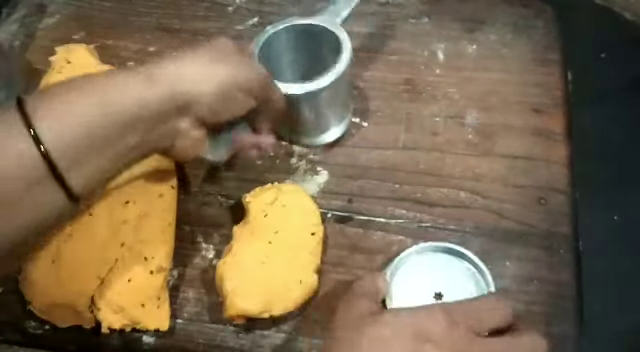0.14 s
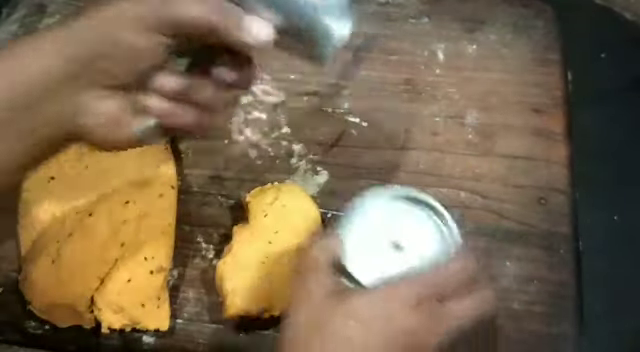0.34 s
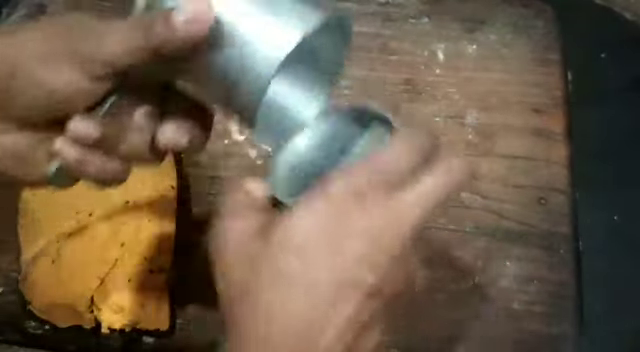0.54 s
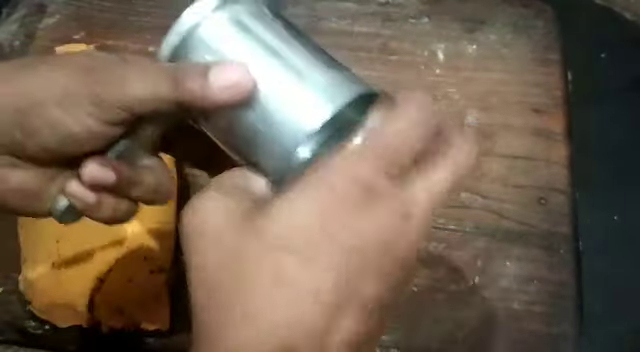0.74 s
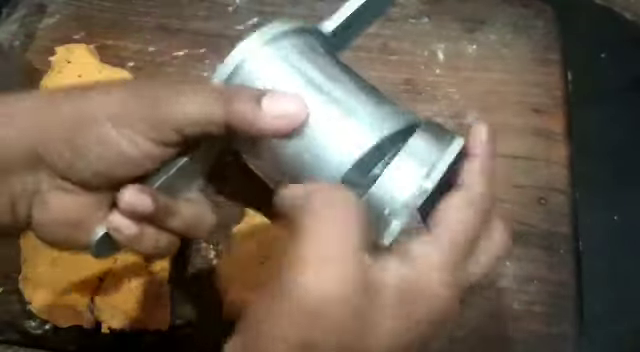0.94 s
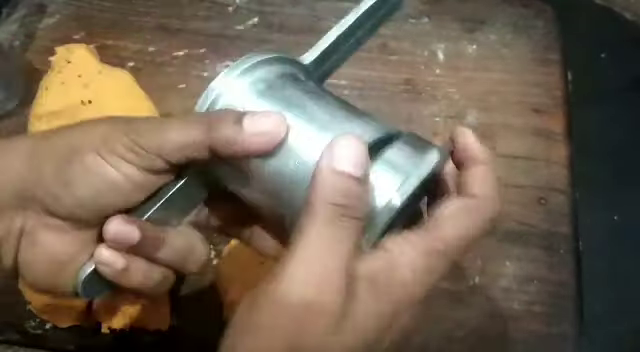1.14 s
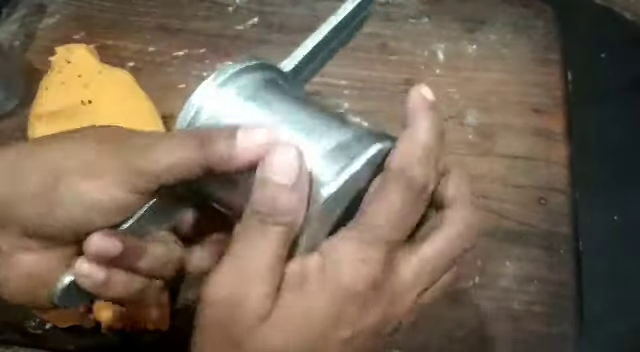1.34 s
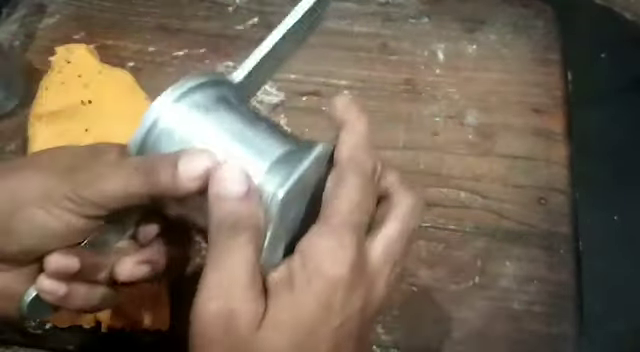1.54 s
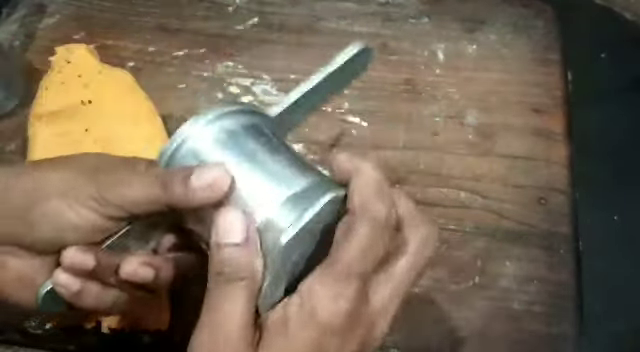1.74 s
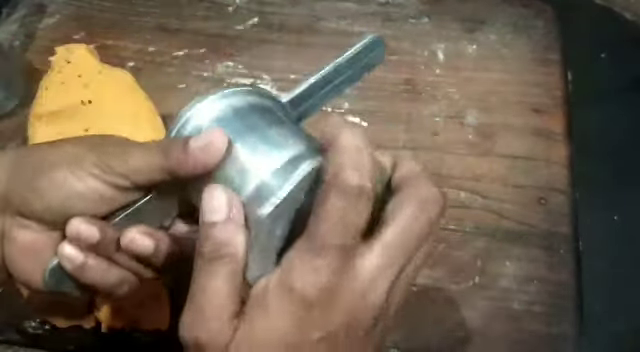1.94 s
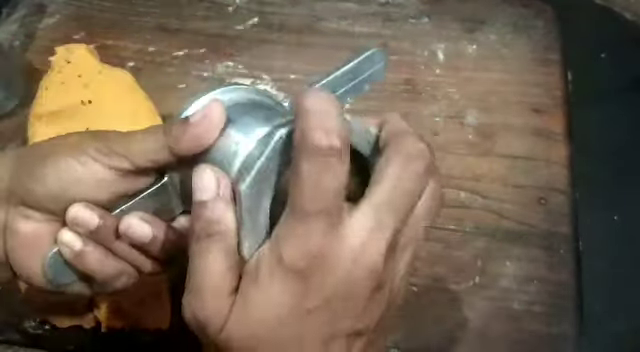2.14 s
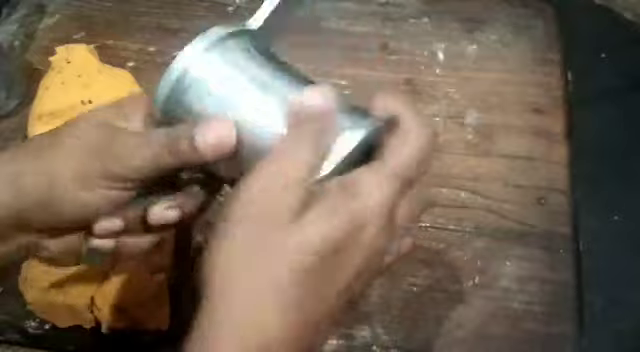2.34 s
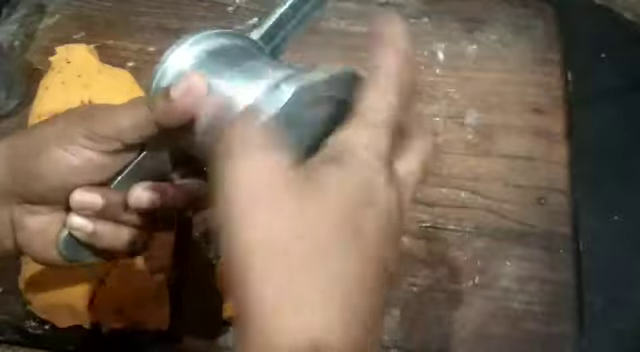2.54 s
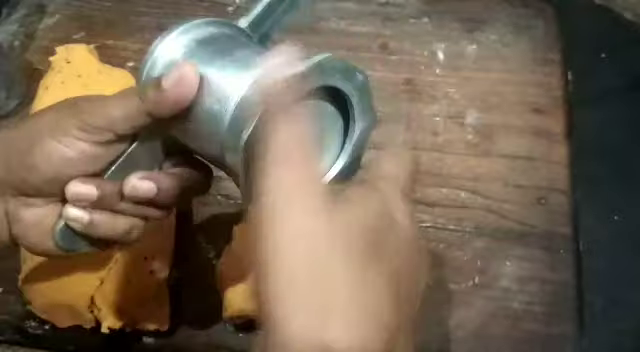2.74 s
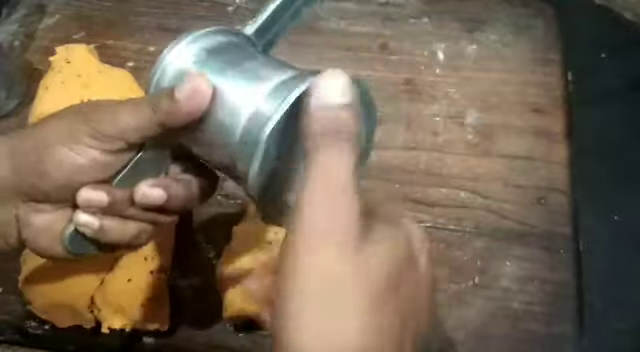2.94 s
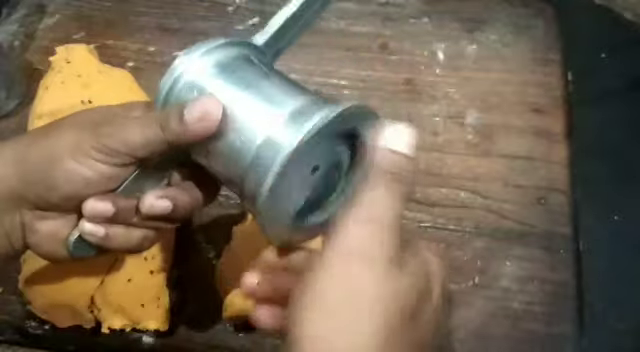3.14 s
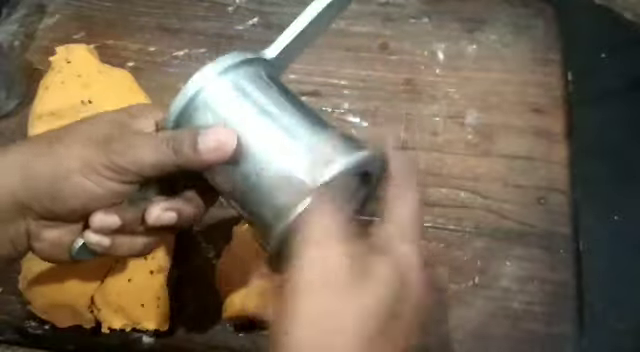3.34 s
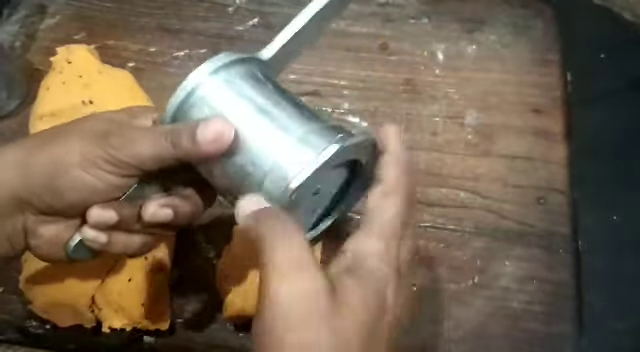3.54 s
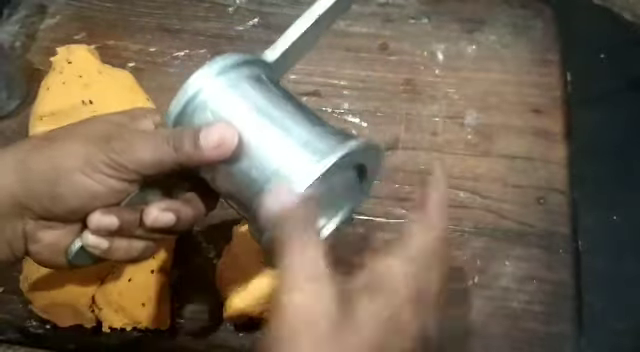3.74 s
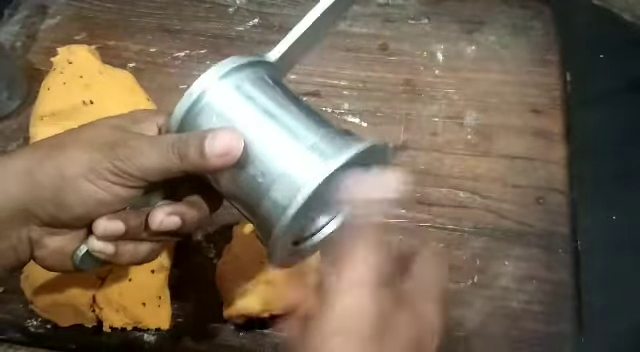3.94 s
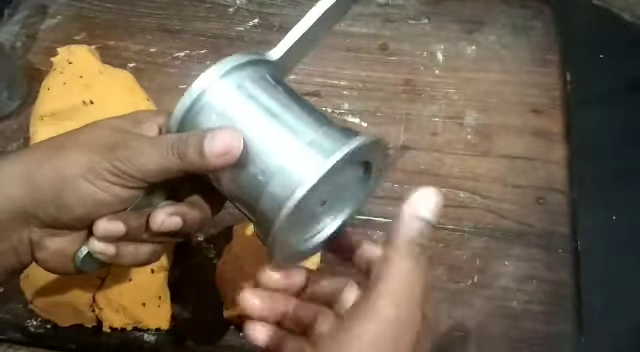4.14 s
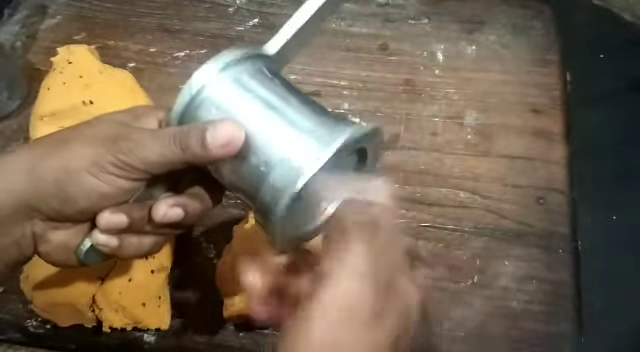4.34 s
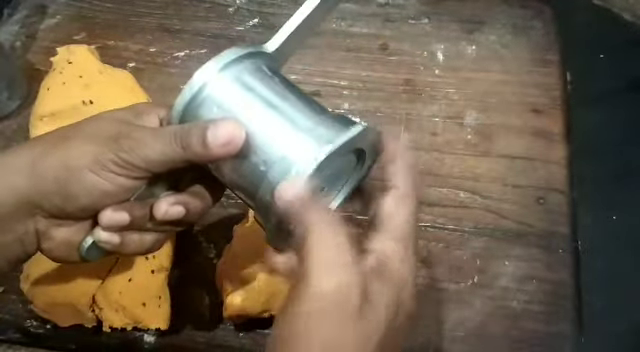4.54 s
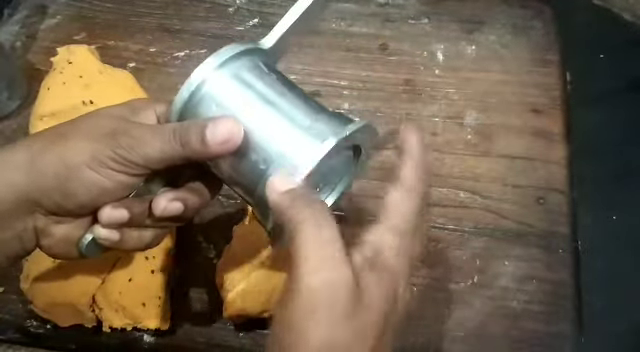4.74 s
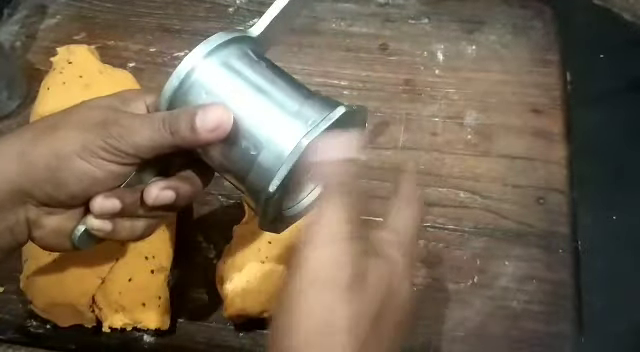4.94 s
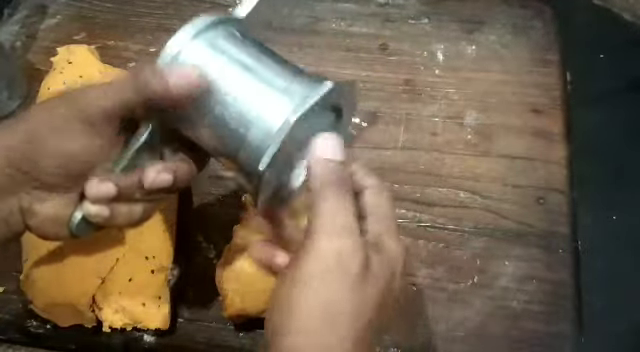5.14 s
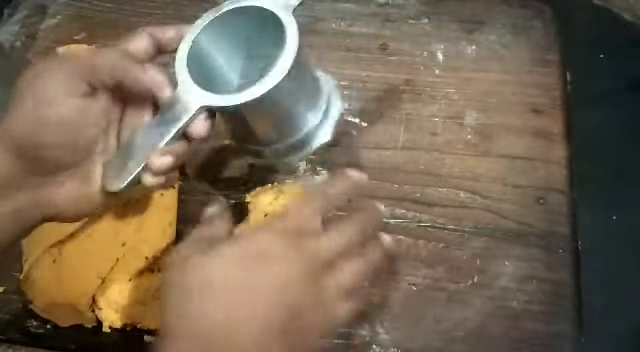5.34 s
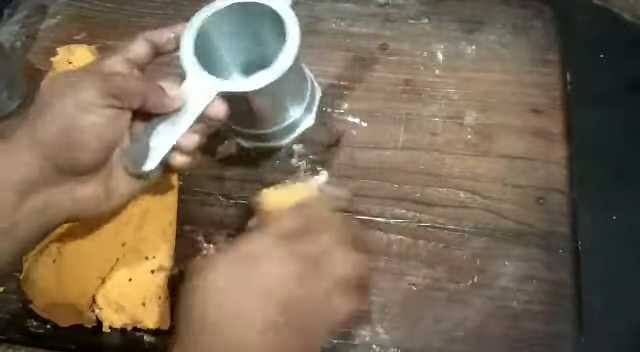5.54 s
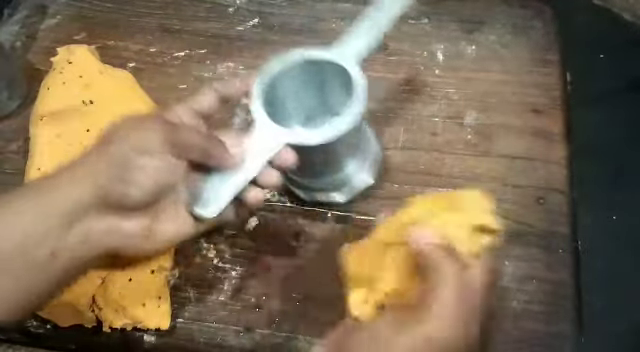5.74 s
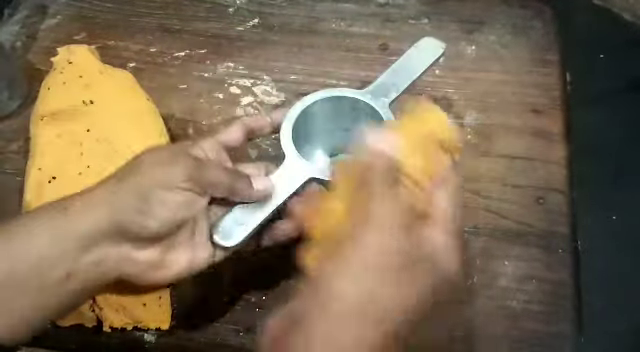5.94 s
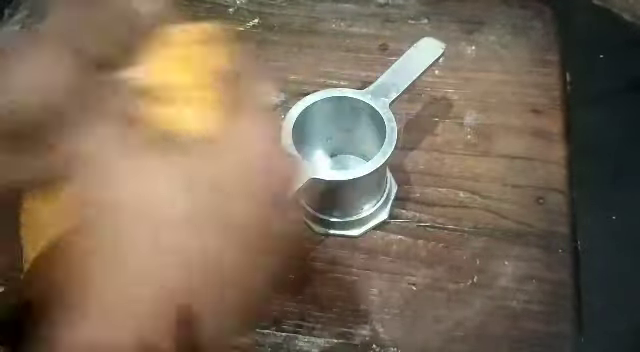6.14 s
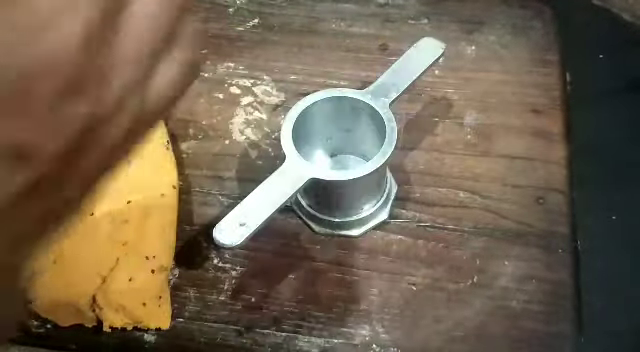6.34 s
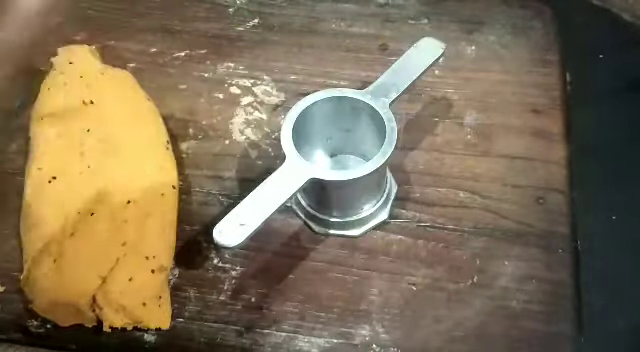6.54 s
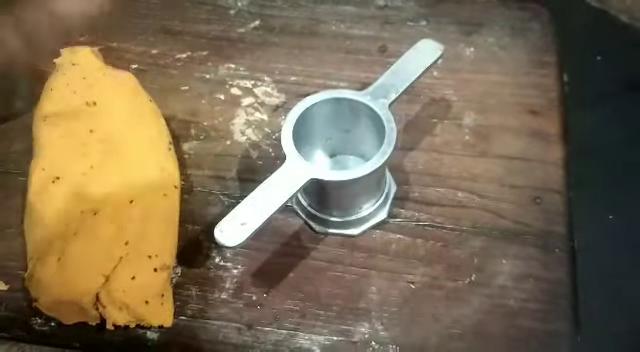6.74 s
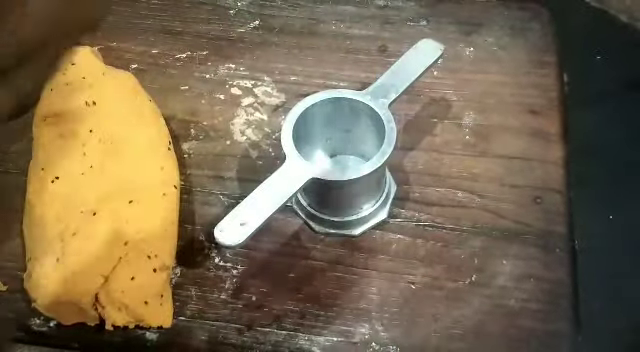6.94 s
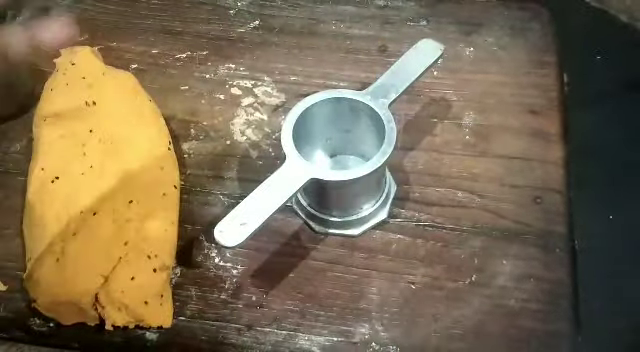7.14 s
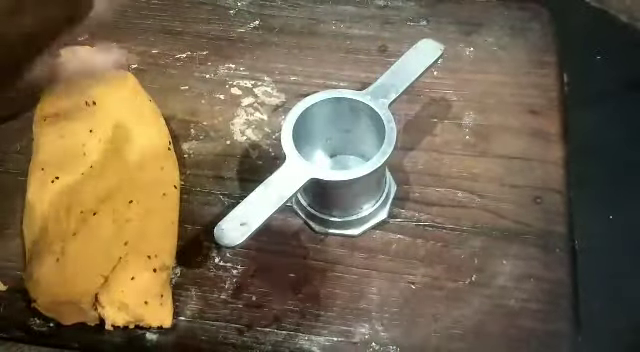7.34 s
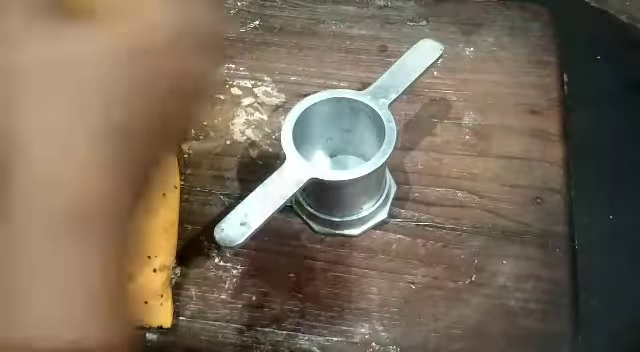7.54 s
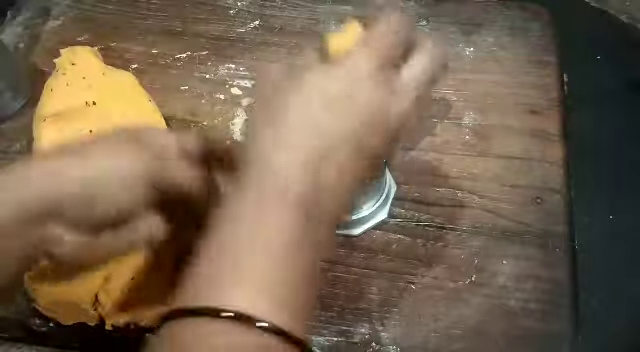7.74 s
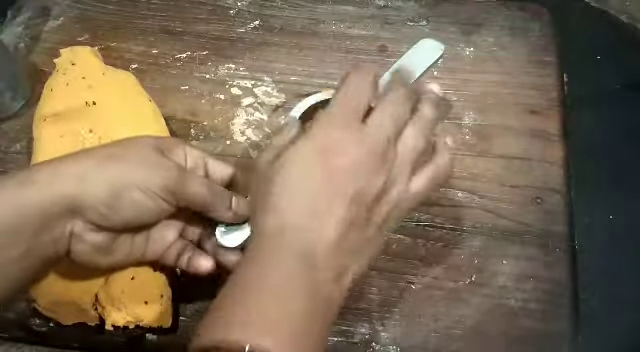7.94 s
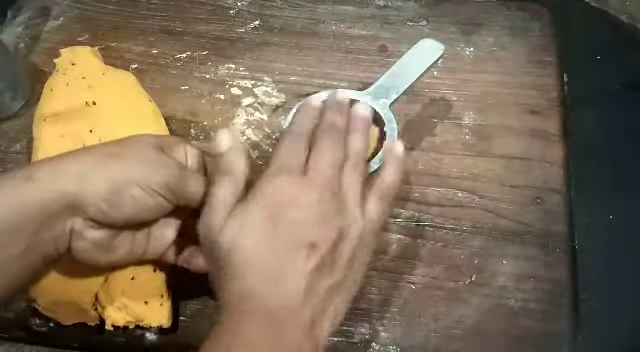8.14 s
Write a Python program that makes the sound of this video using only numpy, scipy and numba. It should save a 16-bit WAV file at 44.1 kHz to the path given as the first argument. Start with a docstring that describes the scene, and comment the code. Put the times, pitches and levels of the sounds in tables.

```python
"""Soft knocks and scuffs on wood, metal clinks and scrapes, then heavier thuds on the board and rubbing palms.
A cast-metal press is fitted together by hand in a small hard-walled kitchen: its threaded cap, holding a loose
disc, is knocked onto the barrel and screwed home. Contact forces drive noise bands, barrel and disc modes and
the air inside the barrel. Pushes ring the board's modes; palms roll dough with coloured, swelling noise.
Room noise, a noise-tail reverb and a two-microphone phone complete the scene."""
import sys
import numpy as np
from scipy import signal
from scipy.fft import rfft, irfft
from scipy.io import wavfile
from scipy.ndimage import uniform_filter1d
from numba import njit

SR = 44100
rng = np.random.default_rng(int(sys.argv[2]) if len(sys.argv) > 2 else 0)


def master_out(mix):
    """Clip the mix to full scale and print it as 16-bit PCM to the path in sys.argv[1]."""
    frames = np.transpose(np.atleast_2d(mix))
    ceiling = np.clip(frames, -1, 1)
    pcm = np.round(ceiling * 32767).astype(np.int16)
    wavfile.write(sys.argv[1], SR, pcm)


N = 361575
T = np.arange(N) / SR

# modes of the loose disc: (f/Hz, width/Hz, relative level/dB)
DISC_MODES = [(2420, 50, -13), (6070, 45, -11), (9185, 35, 0), (10090, 50, -8), (12730, 60, -6),
              (14360, 45, -10)]


def undb(db):
    """Turn decibels into an amplitude factor."""
    return 10 ** (np.asarray(db) / 20)


def unit(x):
    """Scale to an rms of 1."""
    return x / np.sqrt(np.mean(x ** 2))


def colour(x, table, size=512):
    """Causal filter through (f/Hz, level/dB) points, from the cepstrum of the log gain; noise keeps its power."""
    hz, db = np.transpose(table)
    bins = np.linspace(1, SR / 2, size + 1)
    gain = undb(np.interp(np.log(bins), np.log(hz), db))
    # fold the cepstrum forward in time: minimum phase
    ceps = irfft(np.log(gain))
    ceps[1:size] *= 2
    ceps[size + 1:] = 0
    taps = irfft(np.exp(rfft(ceps)))
    taps = np.reshape(taps / np.linalg.norm(taps), (1,) * (x.ndim - 1) + (-1,))
    return signal.oaconvolve(x, taps, axes=-1)[..., :N]


def ring(x, hz, width):
    """One mode, deaf to the lowest and highest pitches; an impulse starts it at about amplitude 1."""
    radius = np.exp(-np.pi * width / SR)
    turn = 2 * np.pi * hz / SR
    return signal.lfilter([.5, 0, -.5], [1, -2 * radius * np.cos(turn), radius * radius], x)


def noisy(x, hz, width):
    """A mode scaled so that steady noise of power 1 rings at about power 1."""
    return np.sqrt(4 * np.pi * width / SR) * ring(x, hz, width)


@njit
def svf(x, hz, width):
    """State-variable band-pass with a moving centre, gain 1 there."""
    y, band, low = np.empty(len(x)), 0., 0.
    for i in range(len(x)):
        g = np.tan(np.pi * hz[i] / SR)
        k = width / hz[i]
        v = (band + g * (x[i] - low)) / (1 + g * (g + k))
        band = 2 * v - band
        low = low + 2 * g * v
        y[i] = k * v
    return y


def walk(rate):
    """A slow random curve: levels held for 1 / rate s, then smoothed twice."""
    t = T[::16]
    hold = int(SR / 16 / rate)
    held = np.repeat(rng.standard_normal(len(t) // hold + 1), hold)
    smooth = uniform_filter1d(uniform_filter1d(held, hold), hold)
    return np.interp(T, t, smooth[:len(t)])


def spikes(s, size):
    """Impulses of the given sizes at the given times."""
    x = np.zeros(N)
    np.add.at(x, (np.asarray(s) * SR).astype(int), size)
    return x


def burst(x, tau_s):
    """Each impulse opens a short fading spray of noise."""
    fade = signal.lfilter([1], [1, -np.exp(-1 / (tau_s * SR))], x)
    return fade * rng.standard_normal(N)


def strokes(table):
    """Gain of strokes that swell and fade evenly in dB, then any further column averaged by stroke strength."""
    s, db, swell_s, fade_s, *share_db = np.transpose(table)[..., None]
    t = T[::32]
    distance = np.where(t < s, (s - t) / swell_s, (t - s) / fade_s)
    each = undb(db - 20 * distance)
    total = each.sum(axis=0) + 1e-30
    curves = [total] + [(each * share).sum(axis=0) / total for share in share_db]
    return [np.interp(T, t, curve) for curve in curves]


def air():
    """Steady room rumble and microphone hiss; part of the bass is shared by both sides and wavers."""
    # spectrum of the noise: (f/Hz, relative level per Hz/dB)
    spectrum = [(18, -70), (30, -30), (98, -32), (199, -3), (554, -9), (600, -12.5), (889, -12),
                (1460, -20), (2750, -16.5), (3980, -20), (4420, -15.5), (8080, -19.5), (13700, -14),
                (16000, -28)]
    own = rng.standard_normal((2, N))
    shared = signal.lfilter([.07], [1, -.93], 1.52 * rng.standard_normal(N)) * undb(0.25 * walk(15.0))
    side_db = -54.5 + np.array([[-.8], [.8]])
    return undb(side_db) * unit(colour(own + shared, spectrum, size=2048))


def kitchen(x):
    """Hard-walled reverb: fading noise for each side, more alike in the bass, the treble dying first."""
    # bands of the tail: (f/Hz, t60/s, relative level/dB)
    room = [(292, 0.52, -15), (800, 0.43, -2.5), (2970, 0.31, 1), (5430, 0.22, 3.5), (12700, 0.19, 3)]
    t = T[:SR]
    tail = 0
    for hz, t60, db in room:
        edges = [hz / 1.8, min(hz * 1.7, .45 * SR)]
        sos = signal.butter(2, edges, "band", fs=SR, output="sos")
        noise = rng.standard_normal((2, SR)) + 655.0 / hz * rng.standard_normal(SR)
        tail = tail + undb(db - 60 * t / t60) * signal.sosfilt(sos, noise)
    tail = tail * np.clip((t - .002) / 0.00018, 0, 1)  # the first walls answer after 2 ms
    return signal.fftconvolve(x, tail / np.linalg.norm(tail[0]), axes=1)[:, :N]


def squeak():
    """A faint thin tone as the press is lowered: a narrow band of noise that swells and fades."""
    start_s, length_s = 5.31, .16
    swell = np.sin(np.pi * np.clip((T - start_s) / length_s, 0, 1))
    return undb(-56) * swell * noisy(rng.standard_normal(N), 4400, 115.0)


def hands():
    """Dry skin on skin and dough: hiss in fine uneven grains, and small ticks as sticky dough lets go."""
    # palm strokes: (t of the loudest moment/s, level/dB, swell by 20 dB/s, fade by 20 dB/s)
    palms = [(5.1, -56.5, 0.088, 0.22), (5.38, -55.5, 0.2, 0.085), (5.61, -46, 0.2, 0.058),
             (5.8, -58.5, 0.64, 0.95), (6.28, -52.5, 0.11, 0.056), (6.5, -50, 0.11, 0.1),
             (6.58, -47.5, 0.031, 0.13), (6.735, -42, 0.025, 0.083), (6.89, -47, 0.047, 0.16),
             (7.1, -49, 0.085, 0.11), (7.32, -55.5, 0.19, 0.049), (7.43, -49, .055, 0.027),
             (7.52, -55.5, 0.069, 0.94), (7.86, -59, 0.03, 0.29)]
    # spectrum of the skin hiss: (f/Hz, relative level per Hz/dB)
    skin = [(350, -11), (600, 7), (834, -2.5), (1130, -2.5), (2120, -1.5), (4220, -5.5), (12300, 2.5),
            (16000, -5)]
    # dough ticks: (t/s, relative level/dB, f/Hz)
    dough = [(5.213, -45.5, 2700), (6.3145, -50, 8300), (7.419, -53, 4220)]
    grains = rng.standard_normal((2, N)) * undb(2.0 * rng.exponential(size=N))
    ticks = 0
    for s, db, hz in dough:
        spray = burst(spikes([s], undb(db - 1.5)), 0.002)
        ticks = ticks + ring(spray, hz, hz * 0.16)
    return colour(unit(grains), skin) * strokes(palms)[0] + ticks


def board():
    """A push rings the wood's modes, duller the longer it lasts; a short noise spray is the hard edge."""
    # knocks on the board, soft ones first: (t/s, relative level/dB, edge over the thud before trim/dB, push/ms)
    thuds = [(.002, -32, -34, 1.8), (0.023, -35, -22, 0.39), (0.05, -44, -25, 0.72), (0.1, -30, -26, 0.38),
             (0.19, -37, -26, 0.3), (5.935, -12, -37, 1.4), (5.938, -1.5, -30.5, 0.57),
             (6.28, -32, -11, 0.28), (7.897, -11, -38, 0.99), (7.954, -27, -19.5, 0.17)]
    # the barrel's foot scuffs the board: (t of the loudest moment/s, relative level/dB,
    # swell by 20 dB/s, fade by 20 dB/s)
    drag = [(0.0, -60.5, 0.0062, 0.13), (.1, -69.5, 0.028, 0.032), (0.2, -70.5, 0.046, 0.0035)]
    # modes of the board: (f/Hz, relative level/dB, t60/s)
    wood_modes = [(200, -12, 0.029), (349.4, 5, 0.041), (406, 3.5, 0.034), (539, -1, 0.05),
                  (772, -4, 0.043), (890, -1, 0.02), (1087, 0, 0.016), (1320, -3, 0.021), (1690, -1, 0.012),
                  (2530, -0.5, 0.0094)]
    s, db, edge_db, push_ms = np.transpose(thuds)
    push = strokes(drag)[0] * undb(6.1 * walk(60.)) * rng.standard_normal(N)
    for start, gain, ms in zip(s, undb(db - 9.5), push_ms):
        pulse = np.hanning(int(ms * SR / 1000) + 3)
        push[int(start * SR):][:len(pulse)] += gain * pulse / pulse.sum()
    wood = 0
    for k, (hz, mode_db, t60) in enumerate(wood_modes):
        width = np.log(1000) / (np.pi * t60)
        wood = wood + (-1) ** k * undb(mode_db) * ring(push, hz, width)
    edge = burst(spikes(s, undb(db + edge_db + 13.0)), 0.0034)
    for _ in range(2):
        edge = svf(edge, np.full(N, 2700.), 2850.0)
    return (wood + edge) * undb([[-1.2], [1.2]])


def chatter(start_s, length_ms):
    """Contact force of one blow: (first sample, a swell that rises fast and fades with its contact time)."""
    t = np.arange(int(length_ms * SR / 150)) / (length_ms * SR / 1000)  # in contact times
    swell = (1 - np.exp(-t / 0.46)) * np.exp(-t)
    return int(start_s * SR), swell / swell.max()


def forces(contacts, db):
    """All blows laid out in time at the given levels."""
    x = np.zeros(N)
    for (i, swell), gain in zip(contacts, undb(db)):
        x[i:i + len(swell)] += gain * swell
    return x


def catches(per_s, tau_s, spread_db):
    """Sliding metal catches at random: sudden jumps of force that fade within milliseconds; rms 1."""
    jumps = (rng.random(N) < per_s / SR) * undb(spread_db * rng.uniform(-1.06, 1, N))
    return unit(0.66 + signal.lfilter([1], [1, -np.exp(-1 / (tau_s * SR))], jumps))


def grit(force, patchiness):
    """Countless small modes blur into a row of bands, each flickering on its own."""
    # toneless part of scrape and blow: (f/Hz, relative level per Hz/dB)
    spectrum = [(300, -16.5), (500, -7.5), (900, -2.5), (2200, 9), (2900, 7), (3700, 8.5), (5300, 6),
                (7000, 7), (7600, 6.5), (10500, 2), (11600, -15), (12600, -1.5), (14000, -3), (15500, -10)]
    hz, db = np.transpose(spectrum)
    centres = 15500 * np.linspace(.15, 1, 28) ** 2
    widths = 1.71 * np.gradient(centres)
    gains = undb(np.interp(np.log(centres), np.log(hz), db)) * np.sqrt(widths)
    out = 0
    for centre, width, gain in zip(centres, widths, gains):
        once = noisy(force, centre, width)
        twice = noisy(once, centre, width) * np.sqrt(2 * np.pi * width / SR)
        out = out + gain * undb(patchiness * walk(18)) * twice
    return out / np.linalg.norm(gains)


def body(modes, force, patchiness, wander, turn):
    """Grip and contact point wander: each mode comes and goes, shifts in pitch and swings between the sides."""
    out = np.zeros((2, N))
    for k, (hz, width, db) in enumerate(modes):
        uneven = force * undb(patchiness * walk(18))
        mode = svf(uneven, hz * (1 + wander * walk(9)), width)
        mode = mode * np.sqrt(SR / (np.pi * width))  # narrow modes ring as loud as wide ones
        angle = (-1) ** k * np.pi / 4 + turn * walk(12)
        out += undb(db) * np.sqrt(2) * mode * np.array([np.cos(angle), np.sin(angle)])
    return out / np.linalg.norm(undb(np.transpose(modes)[2]))


def knocks(s, hz, db):
    """Each blow sets the air in the barrel ringing at its own pitch."""
    width_hz, rise_s = 46, 0.00023
    t = T[:SR // 20]
    fade = (1 - np.exp(-t / rise_s)) * np.exp(-np.pi * width_hz * t)
    x = np.zeros(N)
    for start, pitch, gain in zip(s, hz, undb(db)):
        x[int(start * SR):][:len(t)] += gain * fade * np.sin(2 * np.pi * pitch * t)
    return x


def scraped_air(force):
    """The scrape excites the air inside the barrel, a resonance that moves as cap and palm close it."""
    # pitch of the air in the barrel, lower the more it is closed: (t/s, f/Hz)
    pitch = [(.62, 1540), (1.058, 1310), (1.45, 1630), (1.97, 1450), (2.2, 1130), (2.26, 1270),
             (2.399, 1280), (2.45, 1070), (2.7, 1050), (2.8, 1250), (3.0, 1460), (3.09, 1180), (3.19, 1470),
             (3.36, 1380), (3.41, 1040), (3.57, 1160), (3.66, 1450), (3.83, 940), (3.92, 1520),
             (4.05, 1020), (4.25, 1420), (4.44, 1050), (4.69, 930), (5.0, 970), (5.05, 890)]
    s, hz = np.transpose(pitch)
    return svf(force, np.interp(T, s, hz), 172.0)


def groan(grains):
    """A low groan as the thread binds: swelling grains ring one low mode."""
    # groans: (t of the loudest moment/s, relative level/dB, swell by 20 dB/s, fade by 20 dB/s)
    binds = [(1.7, -38.5, 0.011, 0.038), (2.0, -32, 0.03, 0.021), (2.28, -33, 0.025, 0.056),
             (2.63, -40, 0.021, 0.017), (3.043, -27.5, 0.0081, 0.012), (4.57, -33.5, 0.017, 0.07)]
    return noisy(grains * strokes(binds)[0], 537, 86)


def tinks():
    """Each flick starts the disc's modes in its own mix; they sing until the disc lands against the cap."""
    # the loose disc is flicked: (t/s, relative level/dB)
    flicks = [(2.0564, -25), (2.799, -20), (2.9971, -24), (3.0435, -21), (3.2001, -28), (3.5054, -26)]
    hold_s = 0.026
    t = T[:SR // 10]
    hz, width, db = np.transpose(DISC_MODES)[..., None]
    landing = 1 + (t / hold_s) ** 8
    fade = (1 - np.exp(-t / 0.0007)) * np.exp(-t * width) / landing
    x = np.zeros((2, N))
    mixes = rng.standard_normal((len(flicks), 3, len(DISC_MODES), 1))
    for (s, flick_db), mix in zip(flicks, mixes):
        # the strongest mode keeps its level, the others vary
        modes = undb(flick_db + 4 + db + 2.5 * mix[0] * (db < 0)) * fade
        for side in range(2):
            tones = np.sin(2 * np.pi * hz * t + 0.84 * mix[1 + side])
            x[side, int(s * SR):][:len(t)] += (modes * tones).sum(axis=0)
    return x


def press():
    """Scrapes and clinks drive toneless grit, barrel and disc modes, and the air inside the barrel."""
    # metal on metal: (t/s, relative blow level/dB, left minus right/dB, contact/ms,
    # hollow knock f/Hz, knock over the blow before trim/dB)
    clinks = [(0.638, -2, -3, 2.1, 1563, -21), (0.6447, -5, -4, 1.5, 1475, -19),
              (0.927, -1, 0, 2.1, 1500, -29), (0.9385, -5, -4, 5.6, 1390, -12.5),
              (0.945, -11, 9, 2.7, 1433, -1.5), (1.008, -6, -2, 3.9, 1304, -16),
              (1.1287, -36, -5, 3.0, 1400, 0), (1.1408, -18, -4, 3.5, 1437, -11.5),
              (1.2487, -4, -4, 5, 1240, -25), (1.2926, -3, -1, 8.2, 1596, -18),
              (1.376, -9, 4, 4.8, 1485, -18), (1.3833, -9.5, -12, 5.6, 1440, -14),
              (1.411, -5, 2, 3.8, 1310, -30), (1.6844, -2, -1, 4.3, 1455, -25.5),
              (1.8897, -21.5, -3, 4, 1300, -18), (1.97, -18, 6, 3.6, 1280, -18),
              (1.9792, -10, -11, 3.9, 1560, -20), (2.0026, -1.5, 0, 4.1, 1030, -27),
              (2.0653, -8, -4, 1.2, 1110, -22.5), (2.2723, -22.5, -14, 3.5, 1390, -20),
              (2.3419, -15.5, -1.5, 3.4, 1053, -17), (2.3527, -17.5, -19, 3.2, 1515, -12),
              (2.4632, -10.5, -0.5, 3.1, 975, -16), (2.5752, -3, -1, 3.5, 1610, -49),
              (2.6272, -6, -8, 2.3, 946, -26.5), (2.678, -5, 9, 2.8, 1060, -29),
              (2.7974, -8.5, -6, 2.2, 1190, -15.5), (2.8882, -13, -8, 5.5, 1096, -19),
              (2.997, -14.5, -6, 3.6, 1530, -27), (3.0408, -15, 9, 3.0, 1430, -25),
              (3.0612, -19, 4, 1.9, 1210, -13.5), (3.1702, -11, -11, 2.2, 1500, -16),
              (3.1995, -16, -5, 2.4, 1510, -13), (3.2268, -4, 1, 1.26, 1490, -37),
              (3.2612, -18, -3, 3.8, 1510, -13), (3.365, -18, -2, 3.4, 1473, -6),
              (3.372, -7, -9, 2.7, 1440, -27), (3.3896, -3, -2, 3.3, 990, -24.5),
              (3.4166, -13.5, 7, 3.8, 988, -13.5), (3.4345, -6.5, 3, 5.2, 960, -41),
              (3.5029, -6.5, -1, 3.9, 1095, -23), (3.5669, -12, -7, 3.3, 1083, -16),
              (3.6048, -13, -9, 7, 1130, -24), (3.634, -10, 4, 3.4, 1464, -21),
              (3.6629, -6, -9, 1.7, 1560, -18), (3.698, -25, 5, 5.2, 1400, -12),
              (3.9129, -12, -8, 2.2, 1650, -19), (3.9418, -5.5, -2, 1.8, 1580, -31),
              (4.162, -13, -7, 2.3, 994, -24), (4.2454, -11, -10, 1.7, 1570, -13),
              (4.2572, -21.5, 4, 2.1, 1035, -4.5), (4.2796, -12, -3, 2.7, 1140, -12.5),
              (4.302, -7, -0.5, 3.2, 1670, -26), (4.3305, 0, -2, 2.4, 1300, -39),
              (4.3954, -17, -15, 3.0, 1446, -31), (4.5593, -7, -1, 2.5, 1335, -20),
              (4.579, -33.5, -4, 3.3, 1040, -9), (4.6148, -10.5, -2, 2.9, 1540, -19),
              (4.6418, -12, -9, 4.4, 1075, -19), (4.8536, -11, 1, 3.7, 960, -16.5),
              (5.054, -32.5, -15, 1.2, 887, -2)]
    # slides of metal: first the barrel lifted off the board, then scrapes of the bare barrel,
    # twists of the cap on the thread and faint sliding between them:
    # (t of the loudest moment/s, relative scrape level/dB, swell by 20 dB/s, fade by 20 dB/s,
    # then over the scrape before trim: hollow/dB, barrel ring/dB, disc rattle/dB)
    slides = [(0.0, -41, .01, 0.38, -5.5, -14.5, 4), (0.192, -51, 0.024, 0.016, -11, -30, 6),
              (0.3, -52, 0.041, 0.028, -34, -29, -17), (0.39, -58, 0.061, 0.12, -41, -13, 14),
              (0.64, -26, 0.0039, 0.26, -8, -2.5, 4.5), (0.78, -28.5, 0.11, 0.071, -10, -12, -34),
              (0.946, -24.5, 0.056, 0.23, 1, -11.5, -12), (1.26, -10.5, 0.024, 0.028, -27, -33, -38),
              (1.3, -19, 0.017, 0.1, -3.5, -17.5, -34), (1.42, -19.5, 0.12, 0.076, -6, -16.5, -57),
              (1.62, -40, 0.34, 0.22, -6, -29, -31), (1.69, -22, 0.016, 0.025, -6, -23, -39),
              (1.92, -41.5, 0.27, 0.33, -26, -35, -31), (2.0, -10, 0.02, 0.019, -14, -18.5, -24),
              (2.06, -18, 0.024, 0.034, -7, -5.5, -1), (2.1, -34, 0.024, 0.13, -28, -41, -15),
              (2.28, -28, 0.028, 0.13, 3, -28, -12), (2.36, -23, 0.086, 0.031, -15, -5.5, -35),
              (2.47, -40, 0.02, 0.018, 11, -15, -9), (2.58, -24.5, 0.0036, 0.099, -10, -10.5, -38),
              (2.68, -21.5, 0.039, 0.098, -14, -10, -26), (2.8, -29, 0.096, 0.02, 4, -1, -2),
              (2.925, -16.5, 0.093, 0.045, -8.5, -8.5, -6), (3.045, -27, 0.17, 0.029, 2, -20, 1),
              (3.17, -15.5, 0.083, 0.035, -13.5, -21, -10), (3.26, -27, 0.19, 0.15, -4.5, -5.5, -2),
              (3.385, -17, 0.039, 0.11, -9.5, -19.5, -13), (3.52, -32.5, 0.17, 0.013, -7, -10, -1),
              (3.67, -22.5, 0.13, 0.18, -3.5, -1.5, -1), (3.893, -21.5, 0.042, 0.061, -11, -12, -9),
              (3.99, -28.5, 0.067, 0.6, -2.5, -11, -11), (4.16, -29.5, 0.052, 0.2, -42, -13, -4),
              (4.23, -19.5, 0.037, 0.15, -12.5, -5.5, -12), (4.41, -23.5, 0.3, 0.074, -7, -11.5, -3),
              (4.6, -20, 0.022, 0.073, -6.5, -4.5, -6), (4.66, -21.5, 0.043, 0.072, -3.5, -19, -8),
              (4.855, -21, 0.034, 0.033, -2.5, -14, -25)]
    # modes of the bare barrel: (f/Hz, width/Hz, relative level/dB)
    bare_modes = [(1490, 70, -17), (3600, 14, -6), (3790, 140, -7), (4800, 400, -8), (5430, 60, -9),
                  (5700, 200, -8), (6010, 120, -9), (6690, 30, -5), (8000, 35, -6), (9020, 76, -11),
                  (10500, 45, -10), (12500, 40, -11), (13700, 120, -18)]
    # modes of barrel and cap together: (f/Hz, width/Hz, relative level/dB)
    capped_modes = [(1465, 70, -11.5), (2200, 360, -7), (3670, 260, -5), (4570, 260, -9), (5620, 150, -7),
                    (6060, 90, -5), (6860, 150, -2), (7400, 140, -8), (8050, 130, -4), (9570, 150, -3),
                    (10520, 170, 0), (11200, 220, -10), (12650, 800, -1), (14300, 220, -9)]
    cap_on_s = .925  # the cap meets the barrel and stays

    slide, hollow_db, sing_db, rattle_db = strokes(slides)
    s, db, pan_db, contact_ms, knock_hz, knock_db = np.transpose(clinks)
    contacts = [chatter(start, ms) for start, ms in zip(s, contact_ms)]

    # rough cast metal: dense grains of very uneven size
    grains = unit(rng.standard_normal(N) * undb(2.77 * rng.exponential(size=N)))
    rub = slide * undb(3.2 * walk(50)) * catches(per_s=120., tau_s=0.0017, spread_db=5.5)
    rub_noise = np.sqrt(.5) * (grains + rng.standard_normal((2, N)))  # half shared by the two sides
    blows = np.array([forces(contacts, db - 4.5 + side * pan_db / 2) for side in (1, -1)])
    toneless = grit(rub * rub_noise + blows * rng.standard_normal((2, N)), patchiness=2.5)

    # a clink rings the part that the slide of the moment rings
    barrel_blows = rng.standard_normal(N) * forces(contacts, db - 4)
    barrel_force = undb(sing_db) * (undb(4.5) * rub * grains + barrel_blows)
    disc_force = grains * undb(rattle_db) * (undb(-9) * rub + forces(contacts, db - 10))
    bare = body(bare_modes, barrel_force * (T < cap_on_s), patchiness=2.0, wander=0.0006, turn=0.5)
    capped = body(capped_modes, barrel_force * (T >= cap_on_s), patchiness=2.5, wander=.025, turn=0.9)
    disc = body(DISC_MODES, disc_force, patchiness=5.0, wander=0.004, turn=0.86)

    hollow = scraped_air(grains * undb(hollow_db + 13) * rub) + knocks(s, knock_hz, db + knock_db + 5.0)
    metal = toneless + bare + capped + disc + hollow + groan(grains) + tinks()
    small = signal.butter(2, 260, "high", fs=SR, output="sos")  # so small a body gives no bass
    return signal.sosfilt(small, metal)


def scene():
    """Sum the near sources, offset the left side, then add the room's answer and its noise."""
    near = press() + board() + hands() + squeak()
    left_lag_s = .00015  # the left microphone is further off
    near[0] = undb(-0.6) * np.roll(near[0], round(left_lag_s * SR))
    near[0] += undb(-6.5) * svf(near[0], np.full(N, 12560.), 3000.0)  # and brighter at the very top
    return near + undb(-2) * kitchen(near) + air()


def record(dry):
    """The phone cuts the deep bass, rounds the loudest peaks and cuts the top."""
    low_cut = signal.sosfilt(signal.butter(2, 60, "high", fs=SR, output="sos"), dry)
    top_cut = signal.ellip(12, .5, 95, 15750, fs=SR, output="sos")
    return signal.sosfilt(top_cut, np.tanh(low_cut))


dry = scene()
out = record(dry)
master_out(out)
```